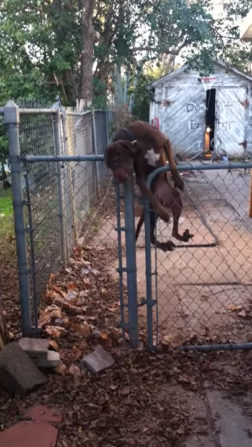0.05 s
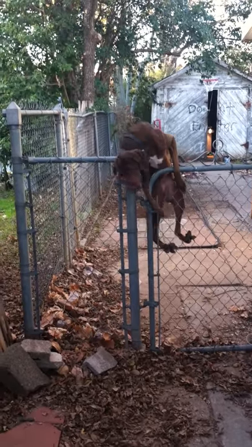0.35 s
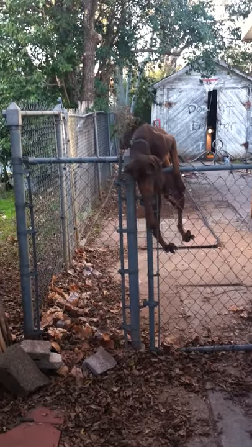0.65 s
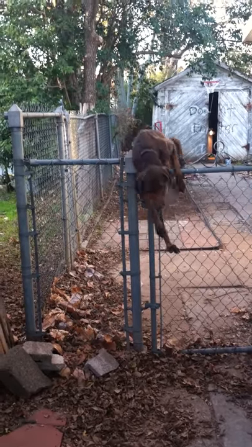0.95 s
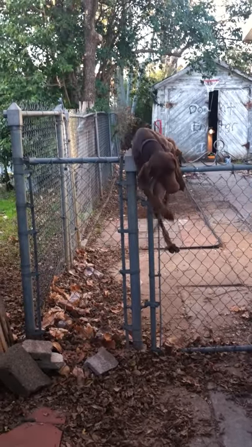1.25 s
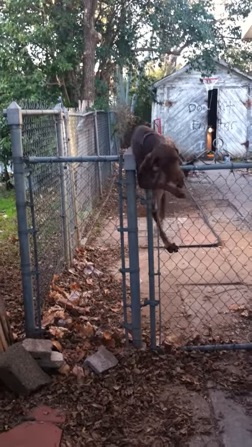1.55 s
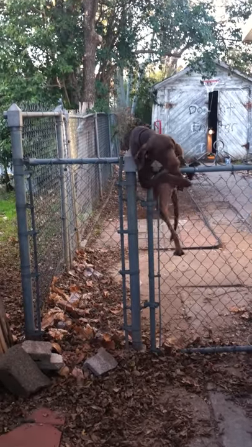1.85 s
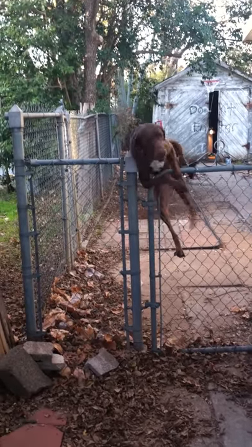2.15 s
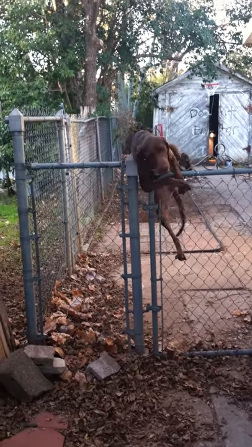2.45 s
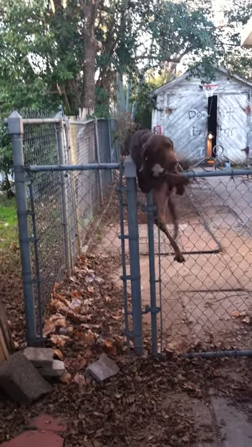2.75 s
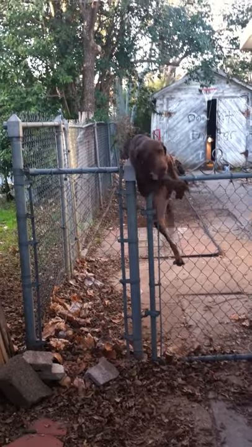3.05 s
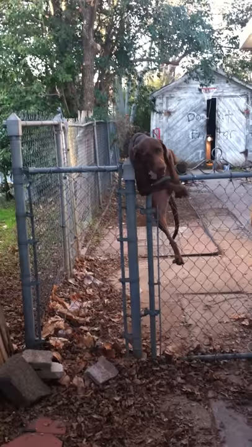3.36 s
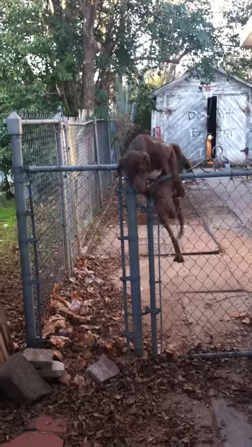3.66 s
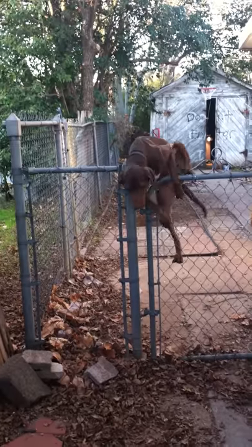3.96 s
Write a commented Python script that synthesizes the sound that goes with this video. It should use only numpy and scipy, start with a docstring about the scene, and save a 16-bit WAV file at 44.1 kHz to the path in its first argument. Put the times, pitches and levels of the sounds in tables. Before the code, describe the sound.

Metal fence gate rattling, clinking and ringing under a climbing dog, with faint distant traffic.

```python
"""A dog scrambles on top of a chain-link gate in a yard, a few metres away, while distant traffic hums. From
the start it scrapes along the rail, and each shove knocks the gate against its post: the contact chatters, the
wire mesh clashes and the steel rings on in its natural modes. Now and then a loose tie wire chinks or the latch
fork meets the post. After two seconds the knocks thin out; near 2.9 s the latch clacks once, and a last flurry
follows, hardest near 3.7 s."""
import sys
import numpy as np
from scipy import signal
from scipy.fft import rfft, irfft
from scipy.io import wavfile
from scipy.ndimage import uniform_filter1d

SR = 44100
rng = np.random.default_rng(int(sys.argv[2]) if len(sys.argv) > 2 else 0)


def bounce(signal):
    """Save signal as a 16-bit WAV file at the path given by the first command-line argument."""
    frames = np.transpose(np.atleast_2d(signal))
    limited = np.clip(frames, -1, 1)
    pcm = np.round(limited * 32767).astype(np.int16)
    wavfile.write(sys.argv[1], SR, pcm)


N = 176400
BASS_BELOW_HZ, TREBLE_ABOVE_HZ = 2550, 8700


def undb(db):
    """Amplitude ratio of a level in decibels."""
    return 10 ** (np.asarray(db) / 20)


def unit(x):
    """Normalisation to rms 1."""
    return x / np.sqrt(np.mean(x ** 2))


def noise(spectrum, ripple_db=0, bass_db=0, treble_db=0, size=N, ripple_step_hz=110, ripple_full_hz=9500):
    """Spectral shaping of white noise; random ripple gathers the treble into narrow partials."""
    hz, db = np.array(spectrum).T
    f = np.maximum(np.fft.rfftfreq(size, 1 / SR), 1)
    grid = np.arange(0, SR / 2, ripple_step_hz)
    ripple = np.interp(f, grid, np.clip(rng.standard_normal(len(grid)), -2, 2))
    partials_db = ripple_db * np.minimum(f / ripple_full_hz, 1) * ripple
    low_shelf = bass_db / (1 + (f / BASS_BELOW_HZ) ** 8)
    high_shelf = treble_db * (1 - 1 / (1 + (f / TREBLE_ABOVE_HZ) ** 8))
    colour = unit(undb(np.interp(np.log(f), np.log(hz), db) + partials_db))
    return irfft(rfft(rng.standard_normal(size)) * colour * undb(low_shelf + high_shelf), size)


def wander(rate_hz):
    """Smooth random modulation of rms 1."""
    step = int(SR / rate_hz)
    held = np.repeat(rng.standard_normal(N // step + 1), step)
    return unit(uniform_filter1d(held, step)[:N])


def decay(t60_s):
    """Exponential damping: 60 dB down after t60_s."""
    return np.exp(-np.log(1000) * np.arange(N) / SR / t60_s)


def add(out, start_s, x):
    """Superposition of x onto out from a start time."""
    i = max(int(start_s * SR), 0)
    out[i:i + len(x)] += x[:N - i]


def chatter(size=2048, bounces_per_s=900, bounce_db=-6.5, time_constant_s=0.0071):
    """Contact bounce: one impulse and its dying random rebounds, of unit total energy."""
    t = np.arange(size) / SR
    bounces = (rng.random(size) < bounces_per_s / SR) * rng.standard_normal(size)
    clicks = bounces * np.exp(-t / time_constant_s) * undb(bounce_db)
    clicks[0] = 1
    return clicks / np.linalg.norm(clicks)


def ring(pitches, modes, start_s, level_db, bass_db=0, scatter_db=3, waver_db=2.5, rise_s=0.0024):
    """Modal vibration: blows excite damped sinusoids in random phase, wavering as the gate flexes."""
    onsets = np.clip((start_s * SR).astype(int), 0, N - 1)
    out = np.zeros(N)
    for hz, (mode_db, t60_s) in zip(pitches, modes):
        scatter, phase_y, phase_x = rng.standard_normal((len(onsets), 3)).T
        strength = undb(level_db + mode_db + bass_db * (hz < BASS_BELOW_HZ) + scatter_db * scatter)
        blows = np.zeros(N, complex)
        blows[onsets] = strength * np.exp(1j * np.arctan2(phase_y, phase_x))
        pole = np.exp((2j * np.pi * hz - np.log(1000) / t60_s) / SR)
        rise_pole = pole * np.exp(-1 / (rise_s * SR))  # its faster decay, subtracted, rounds the attack
        vibration = signal.lfilter([pole - rise_pole], np.poly([pole, rise_pole]), blows).imag
        out += vibration * undb(waver_db * wander(rate_hz=70))
    return out


# Spectrum of the traffic: frequency_hz, relative_density_db
TRAFFIC_SPECTRUM = [(15, -76), (25, -42), (64, -30), (82, -19.5), (164, -3.5), (246, -7), (281, -12),
                    (313, -8.5), (482, -13.5), (537, -7), (582, -7.5), (871, -10), (1200, -9), (1410, -29),
                    (1530, -20), (2170, -27), (15500, -63)]


def traffic(level_db=-57.5):
    """Incoherent sources sum to noise: distant traffic is a low, slightly wavering hum."""
    return noise(TRAFFIC_SPECTRUM) * undb(level_db + 1.7 * wander(rate_hz=6.46))


# Envelope of the scraping: time_s, relative_level_db
SCRAPE_ENVELOPE = [(0, -56), (0.172, -48.5), (.35, -81), (.55, -69), (.8, -65), (.9, -40), (1.0, -64),
                   (1.38, -81), (1.438, -56), (1.53, -61.5), (1.701, -54), (1.95, -47), (2.18, -58.5),
                   (2.549, -63), (2.758, -68), (2.86, -49), (3.0, -59.5), (3.3, -53.5), (3.42, -56),
                   (3.8, -42), (4, -61)]
# Spectrum of the scraping: frequency_hz, relative_density_db
SCRAPE_SPECTRUM = [(500, -9.5), (1600, 5), (3000, -2.5), (7000, -3), (10000, -5.5), (15500, -9)]


def scrape(gain_db=-5):
    """Sliding friction: the dog and the wire rub along the rail with a grainy hiss."""
    level_db = np.interp(np.arange(N) / SR, *np.array(SCRAPE_ENVELOPE).T)
    grain_db = 2 * wander(rate_hz=250) + 1.9 * wander(rate_hz=31.1)
    return noise(SCRAPE_SPECTRUM) * undb(level_db + grain_db + gain_db)


# Knocks of the gate: start_s, relative_level_db, extra_bass_db, extra_treble_db, extra_frame_ring_db
KNOCKS = [(0.0, -45.5, 4.0, -9, 9), (0.018, -34.0, -2.5, 2.0, -4), (0.026, -45, 1, -6, 7.5),
          (0.066, -42, 5, -13, -1.5), (0.185, -39, 2.0, -20, 1.5), (0.23, -37.5, 0, -4, 0.5),
          (0.26, -36, -1.5, -3, 2.5), (0.277, -36.5, 1, -10, 0.5), (0.378, -34.5, 1.5, 2, -2.5),
          (0.415, -33, 0, -8, 0.5), (0.438, -33.5, -1, -2, -8), (0.449, -46, -6, -8, 1),
          (0.572, -40.0, 1.5, -6, -0.5), (0.601, -37.0, -1.5, -30, 0), (0.643, -39.5, 4, -1, -5.5),
          (0.654, -37.5, -1, -9, -3), (0.727, -38, 0, 1, -3), (0.765, -38.5, 1.5, -9, 0.5),
          (0.792, -41.5, 2, -1, -2), (0.861, -41, 0, -15, 4.5), (0.915, -36.0, 2.5, -4, -4),
          (0.936, -30, -1.5, -2, 2.5), (0.947, -36, -7, -8, -10), (1.033, -33.5, 1, 2, -1),
          (1.067, -34, -2.5, -2, -4), (1.086, -37, 2.5, 7, -10), (1.134, -29.5, 1.5, 5, -1),
          (1.15, -36.5, -12.5, -11, 13), (1.171, -52, 12, -8, -13), (1.196, -31, -1.0, 6, 1.5),
          (1.215, -32.0, 1.5, 0, -8), (1.296, -37.5, 1.5, -4, 0), (1.563, -55, 8, 2.0, 7),
          (1.597, -57.5, -4, -5, 8.5), (1.633, -32.5, -13, 12.5, -8), (1.643, -34.5, 1, -21, -0.0),
          (1.658, -33.5, -5, -18, 1.5), (1.757, -35, -0.5, 3.5, 3), (1.804, -34.0, 2, 0, -1.5),
          (1.835, -37.5, -1.5, 3, 0.0), (1.892, -45, -14, 17.5, -12), (1.945, -49, 4, -25, 0),
          (2.074, -38.0, -0.5, 1, 0), (2.311, -43.5, -3.5, -18, 3.5), (2.629, -38.5, 1.0, -1.0, 0),
          (2.783, -50.5, 3.5, 2, 4), (2.819, -46.5, 6.5, 0.0, 1), (3.061, -27.5, -3.5, 9.5, 4.5),
          (3.069, -26.0, 1, 5, -5), (3.124, -32, -2, -2.0, -3), (3.178, -28, -5, 3.5, 5),
          (3.192, -35.5, -0.5, -14, -4), (3.276, -39, -3, -0.0, 7.5), (3.343, -40.5, -2.5, -6, 7),
          (3.386, -55, 10, -11, 0.5), (3.455, -48, -1.5, 1, 3), (3.508, -36.5, -5, 17.5, -17),
          (3.518, -33.5, -3.0, -10, -1.0), (3.535, -31, -4.5, -7, 3), (3.607, -33.0, -3.5, 5, 3.5),
          (3.632, -27, -2, 4.5, -2.5), (3.686, -26.0, -3.5, -3, 1.5), (3.72, -20, -2.0, 2.0, -5),
          (3.743, -19, -7.5, -1, 2), (3.747, -36, 2, -6.0, 8), (3.887, -35, -1.0, -1, 0.5)]
# Spectrum of the clashing mesh: frequency_hz, relative_density_db
MESH_SPECTRUM = [(60, -34), (300, -20), (460, -30), (545, 0.5), (750, -9.5), (900, -4), (1010, 0.5),
                 (1220, -11), (1550, 7.5), (2150, 2), (2350, -5.5), (3000, -6), (4500, -4.5), (5450, -7),
                 (5850, -1), (6450, -0.5), (7150, -9.5), (7550, -3.5), (8600, -7.5), (11200, -20.5),
                 (11900, -22), (12700, -18), (15500, -23.5)]


def mesh(size=24000, gain_db=-1.5, tail_db=-11.5):
    """Dense modes merge into noise: each knock clashes another patch of wire; the yard reverberates."""
    out = np.zeros(N)
    envelope = np.hypot(decay(t60_s=0.12), undb(tail_db) * decay(t60_s=0.46))[:size]
    for start_s, level_db, bass_db, treble_db, _ in KNOCKS:
        clash = noise(MESH_SPECTRUM, ripple_db=6.5, bass_db=bass_db, treble_db=treble_db, size=size)
        add(out, start_s, undb(level_db + gain_db) * signal.fftconvolve(chatter(), clash * envelope))
    return out


# Modes of the frame tubes: pitch_hz; and for each: relative_level_db, t60_s
FRAME_HZ = [1376, 1405, 1438, 1457, 1592, 1697, 1905, 1932, 2158, 2444, 3890, 3965, 4017, 4110]
FRAME_MODES = [(-17.5, 1.88), (-18.5, 1.44), (-19.5, 2.23), (-18.5, .6), (-7, 0.25), (-12.5, 0.76),
               (-15, 0.64), (-17.5, 0.44), (-13, 0.36), (-14, 0.33), (-18, 0.79), (-13, 0.34),
               (-11.5, 0.43), (-15.5, .3)]
# Modes of the bands, hinges and tension bar: pitch_hz; and for each: relative_level_db, t60_s
FITTINGS_HZ = [537, 975, 2755, 2842, 3135, 3480, 4759, 5160, 5294, 5410, 5530, 5655]
FITTINGS_MODES = [(-16, 0.31), (-15.5, 0.3), (-19.5, 0.25), (-8.5, 0.26), (-15.5, 0.18), (-13, 0.13),
                  (-21.5, 0.43), (-14.5, 0.25), (-8, 0.12), (-12, 0.23), (-12.5, 0.091), (-11, 0.19)]
# Modes of the wire ends and ties: pitch_hz; and for each: relative_level_db, t60_s
WIRES_HZ = [6132, 6250, 6481, 6611, 6896, 7408, 7460, 7527, 7675, 8107, 8678, 11920, 13600, 14030]
WIRES_MODES = [(-14, 0.12), (-15, 0.11), (-11, 0.072), (-16, 0.077), (-16.5, 0.14), (-11, 0.27),
               (-16, 0.23), (-11.5, 0.18), (-13, 0.18), (-14.5, 0.21), (-18, 0.16), (-21, 0.19),
               (-24, 0.14), (-25, 0.11)]


def gate_ring(frame_db=-3.5, fittings_db=-3, wires_db=-1.5, hard_knock_db=-35.5, loss_db_per_db=0.33):
    """Free vibration: after every knock the frame and fittings ring on and the wire ends jingle."""
    start_s, level_db, bass_db, _, extra_ring_db = np.array(KNOCKS).T
    # A hard knock adds more clash than ring.
    compressed_db = level_db - loss_db_per_db * np.maximum(level_db - hard_knock_db, 0)
    frame = ring(FRAME_HZ, FRAME_MODES, start_s, frame_db + compressed_db + extra_ring_db, bass_db)
    fittings = ring(FITTINGS_HZ, FITTINGS_MODES, start_s, fittings_db + compressed_db, bass_db)
    wires = ring(WIRES_HZ, WIRES_MODES, start_s, wires_db + level_db)
    return frame + fittings + wires


# Chinks of the loose tie wire: start_s, relative_level_db
TIE_CHINKS = [(0.017, -39), (.378, -36.5), (.727, -38), (1.034, -40), (1.297, -38.5), (2.075, -44),
              (3.125, -40)]
# Modes of the tie wire: pitch_hz; and for each: relative_level_db, t60_s
TIE_HZ = [2838, 5298, 5650]
TIE_MODES = [(-8, 0.24), (-2, 0.18), (-7, 0.13)]


def tie_wire():
    """A small, stiff body has high natural frequencies: the loose tie wire chinks when jolted."""
    return ring(TIE_HZ, TIE_MODES, *np.array(TIE_CHINKS).T)


# Blows of the latch fork on the post: start_s, relative_level_db
FORK_CLANKS = [(.44, -38.5), (.653, -42), (.947, -38.5), (1.086, -37), (1.215, -36), (3.069, -29.5),
               (3.191, -39), (3.534, -37.5), (3.634, -30), (3.747, -27)]
# Modes of the fork: pitch_hz; and for each: relative_level_db, t60_s
FORK_HZ = [1000, 1045, 2020, 2110, 2200]
FORK_MODES = [(-6.5, 0.15), (-8, 0.11), (-3, 0.065), (-0.5, 0.16), (-4.5, 0.099)]


def latch_fork():
    """Impact excitation: the fork meets the post and its close, quickly damped modes clank."""
    return ring(FORK_HZ, FORK_MODES, *np.array(FORK_CLANKS).T)


# Spectrum of the latch's clack: frequency_hz, relative_density_db
LATCH_SPECTRUM = [(120, -41), (200, -17), (430, -31), (842, -29), (1050, -15), (1590, -3), (1740, -2),
                  (2700, -8.5), (2900, -5), (4840, -2), (5590, -4), (6350, -4), (10400, -8.5), (11800, -6),
                  (15500, -23)]
# Modes of the latch: pitch_hz; and for each: relative_level_db, t60_s
LATCH_HZ = [4890, 6214, 11635, 11716]
LATCH_MODES = [(-10, .1), (-6, 0.081), (-4.5, 0.11), (-8, .12)]


def latch(start_s=2.892, level_db=-31, tail_db=-11):
    """A brief impact has a broad spectrum: the latch gives one bright clack with a high ping."""
    out = np.zeros(N)
    attack = 1 - decay(t60_s=0.0065)
    release = decay(t60_s=0.07) + undb(tail_db) * decay(t60_s=0.35)
    clack = noise(LATCH_SPECTRUM) * attack * release
    add(out, start_s, undb(level_db) * signal.fftconvolve(chatter(), clack))
    return out + ring(LATCH_HZ, LATCH_MODES, np.array([start_s]), level_db)


def scene(gate_db=-1.5):
    """Linear superposition: the pressures of all sources add in one channel."""
    background = traffic() + scrape()
    gate = mesh() + gate_ring() + tie_wire() + latch_fork()
    return (background + undb(gate_db) * gate + latch())[None]


def record(dry, cutoff_hz=15700):
    """Band limiting: a steep elliptic low-pass removes the highest treble."""
    return signal.sosfilt(signal.ellip(10, .2, 80, cutoff_hz, fs=SR, output="sos"), dry)


dry = scene()
out = record(dry)
bounce(out)
```